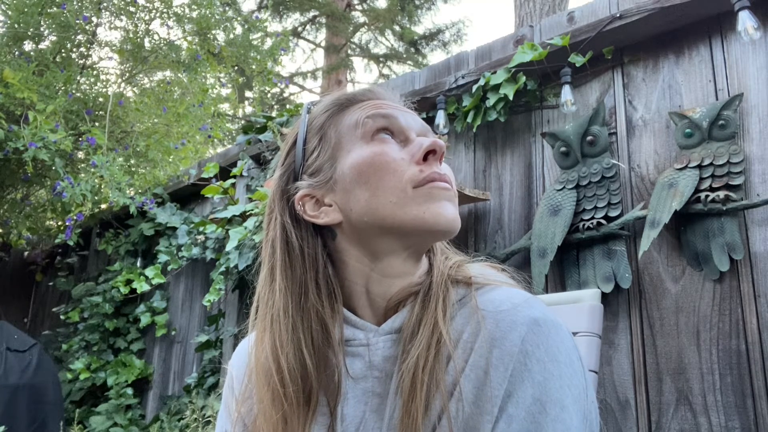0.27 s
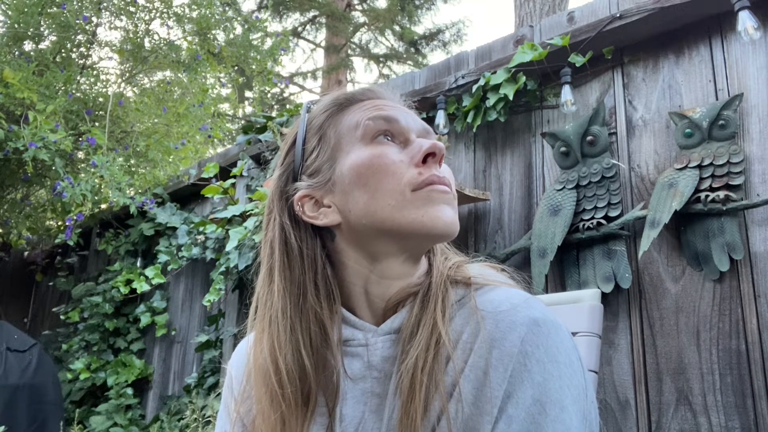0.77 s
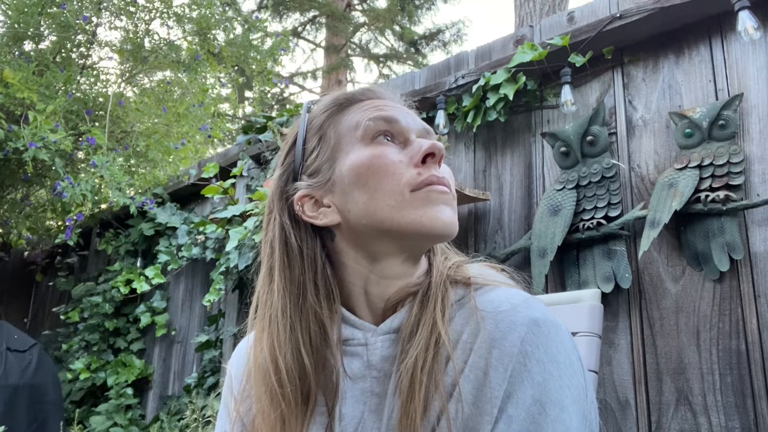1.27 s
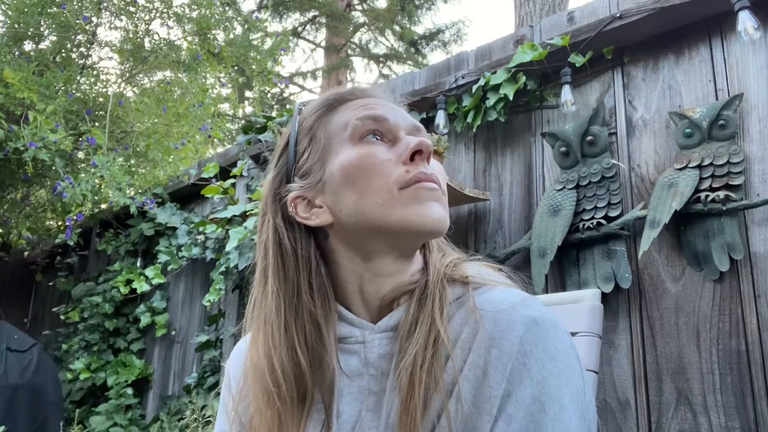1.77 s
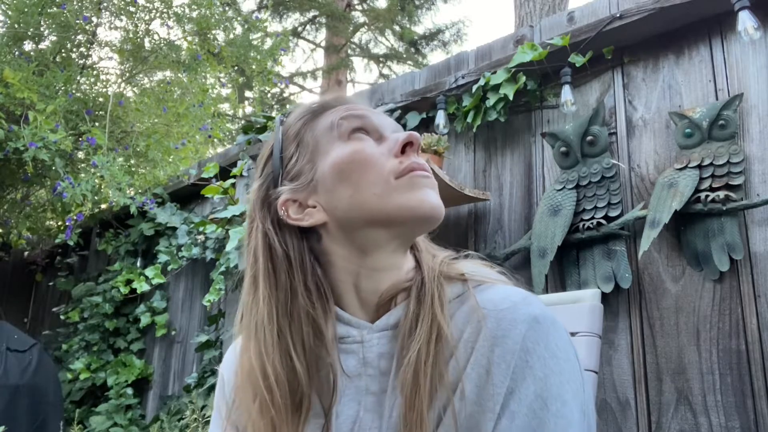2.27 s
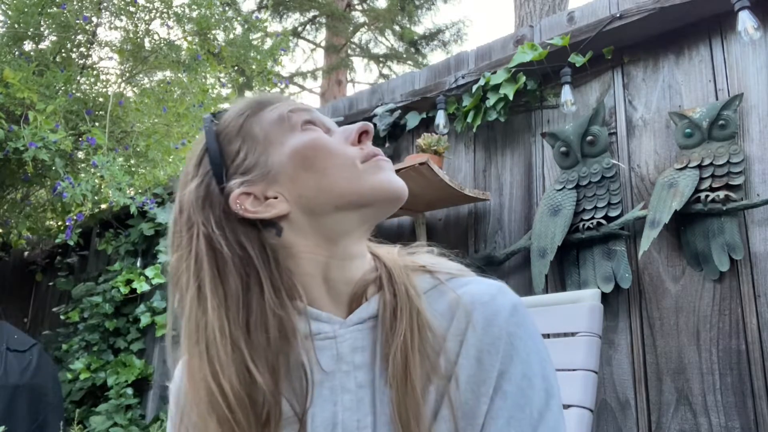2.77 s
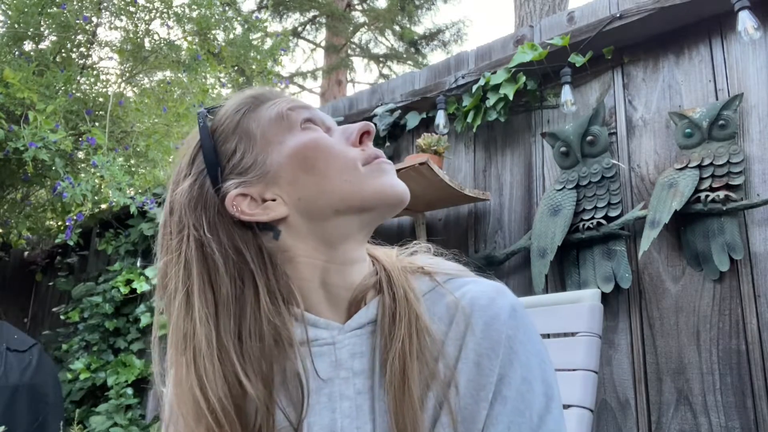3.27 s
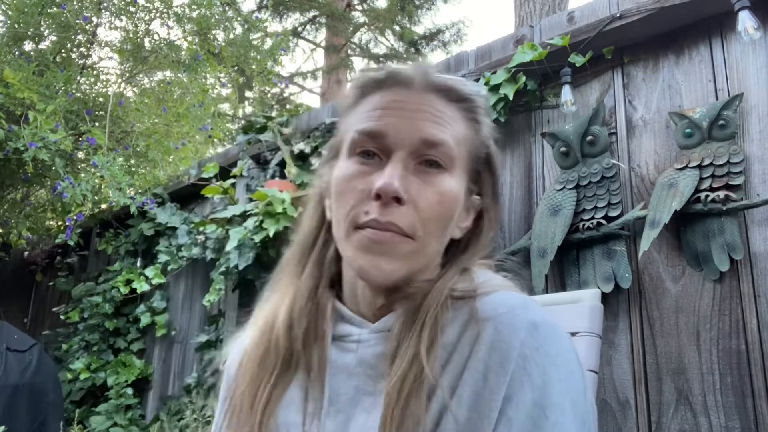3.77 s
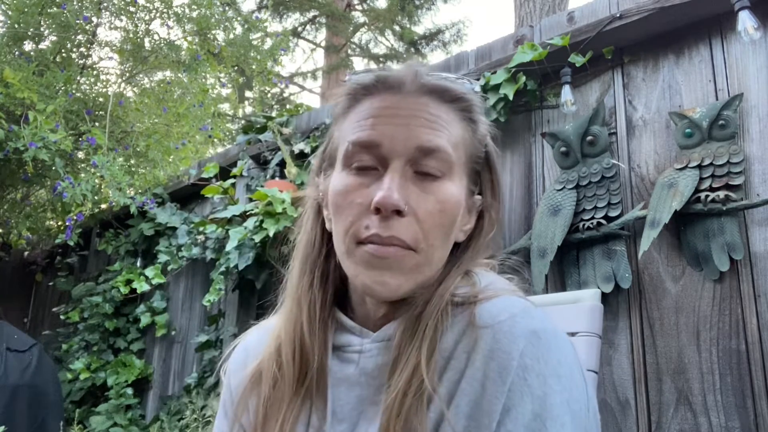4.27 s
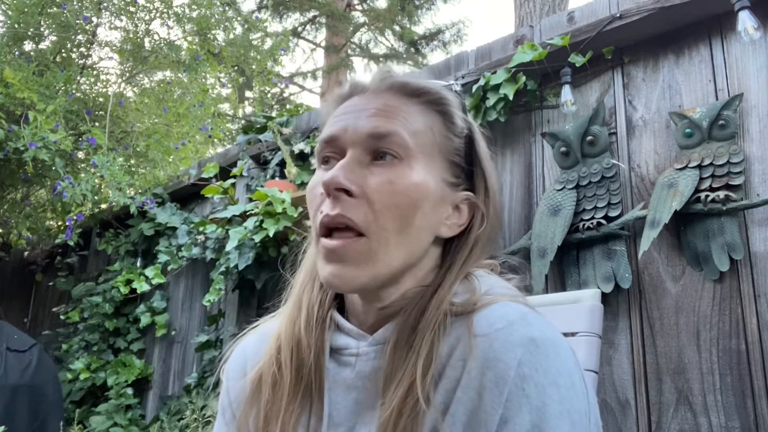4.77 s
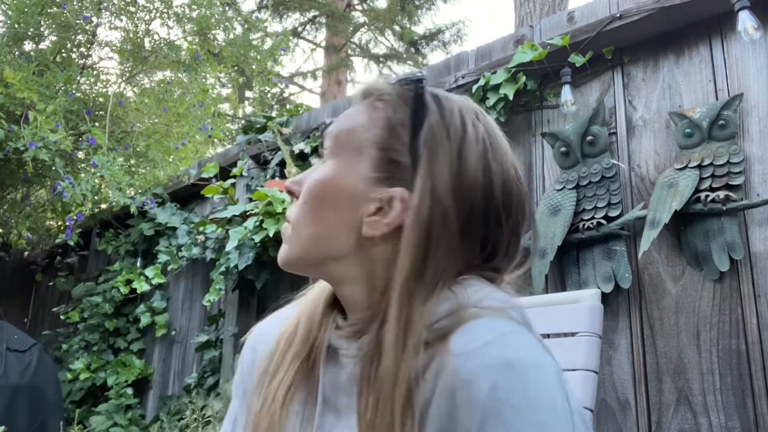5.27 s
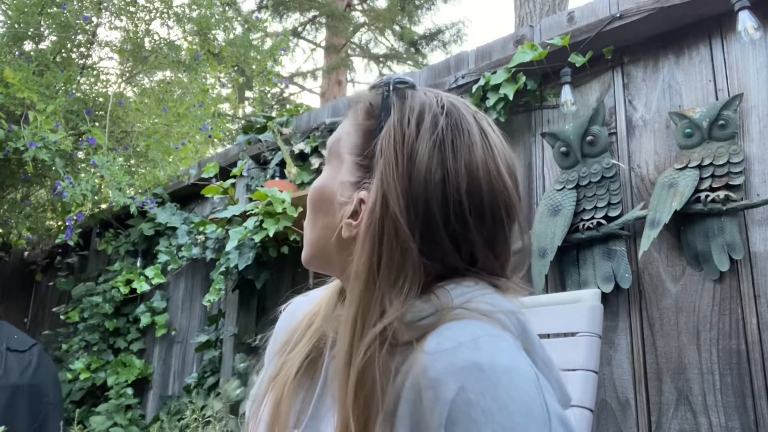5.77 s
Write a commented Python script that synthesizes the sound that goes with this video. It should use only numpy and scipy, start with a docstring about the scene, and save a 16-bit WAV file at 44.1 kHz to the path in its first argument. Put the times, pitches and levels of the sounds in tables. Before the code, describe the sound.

Two hummingbirds trade short, high chip calls outdoors, with faint distant birds, a low rumble and a few soft lip clicks nearby.

```python
"""Hummingbird chase in a backyard

A hummingbird chases a rival with sharp, falling chips, whistled by its voice organ (the syrinx).
The rival answers lower, from the left. Fence and ground throw each chip back; the trees let it ring on.
Small birds whistle far off over a low town rumble and a hiss of air. Close by, someone's lips part
with soft clicks, a garden chair knocks and a sweatshirt rubs."""
import sys
import numpy as np
from scipy import signal
from scipy.fft import rfft, irfft
from scipy.io import wavfile
from scipy.ndimage import uniform_filter1d

SR = 44100
rng = np.random.default_rng(int(sys.argv[2]) if len(sys.argv) > 2 else 0)


def dump(signal):
    """Clip the signal to [-1, 1] and save it as 16-bit WAV at the path in sys.argv[1]."""
    limited = np.clip(np.atleast_2d(signal).T, -1, 1)
    pcm = np.round(limited * 32767).astype(np.int16)
    wavfile.write(sys.argv[1], SR, pcm)


N = 265526


# How the throat shapes the tone, and the beak its octave: f/Hz, gain/dB
THROAT_GAIN = [(5000, -8), (5600, 0.5), (6400, -5.5), (7500, -3.5), (8500, -0.5), (9200, -3),
               (10000, -10.5)]
BEAK_GAIN = [(10500, -1.5), (11500, 4.5), (12200, 0.5), (13000, -4), (14300, -0.5), (15200, -6),
             (15800, -27.5), (17000, -46.5)]

def chip(length, pitches, bend, attack_s, soft_db, growth_db, plunge_s, close_s, open_s=.0012):
    """One syrinx whistle and its octave, as complex waves: the pitch plunges, then glides down."""
    onset_hz, top_hz, end_hz = pitches
    t = np.arange(round(length * SR)) / SR
    progress = t / length
    glide = end_hz + (top_hz - end_hz) * (1 - progress) ** bend
    plunge = (onset_hz - top_hz) * np.exp(-t / plunge_s)
    hz = (glide + plunge) * (1 + .008 * waver(len(t), span=60))
    phase = 2 * np.pi * np.cumsum(hz) / SR
    opening = np.clip(np.minimum(t / open_s, (length - t) / close_s), 0, 1)
    shape_db = soft_db * np.maximum(1 - t / attack_s, 0) + growth_db * (progress - .5)
    flutter_db = 2.5 * waver(len(t), span=90)
    push = np.sin(np.pi / 2 * opening) ** 2 * gain_of(shape_db + flutter_db)
    tone = push * gain_of(look_up(THROAT_GAIN, hz)) * np.exp(1j * phase)
    octave = push * gain_of(look_up(BEAK_GAIN, 2 * hz)) * np.exp(2j * phase)
    return tone, octave


def snap(length=.00092, hz=12000):
    """The tiny high tick as the syrinx opens."""
    size = round(length * SR)
    return signal.windows.hann(size) * np.sin(2 * np.pi * hz * np.arange(size) / SR)


# The chips of the bird overhead: t/s, length/s, level/dB, onset f/Hz, top of the glide f/Hz,
# end f/Hz, bend of the glide (1 = straight), echo gain/dB
CHASER_CHIPS = [(.156, 0.023, -30.5, 9500, 8680, 8366, 2.7, 6.5),
                (.688, 0.021, -35, 9870, 8930, 8550, 3.7, 9), (1.2, 0.026, -25, 9390, 8100, 7160, 2.8, 3),
                (2.153, 0.036, -25.5, 9420, 8100, 5874, 1.63, 3),
                (2.95, 0.035, -19.5, 9370, 8480, 6120, 2, -1),
                (3.75, 0.03, -24, 9110, 8500, 6250, 0.77, -1),
                (4.584, .033, -14, 9000, 8000, 5620, 2.5, -4),
                (5.447, 0.025, -24, 9100, 7700, 5856, 2.7, 4.5)]

def chaser(octave_db=-17, octave_echo_db=-19, octave_lag_rad=2.1, snap_db=-27, pan_db=-2.5):
    """Hard, bright chips that snap open; the bird moves, so each has its own echoes."""
    out = np.zeros((2, N))
    for s, length, db, *pitches, bend, echo_db in CHASER_CHIPS:
        tone, octave = chip(length, pitches, bend, attack_s=.004, soft_db=-12.5, growth_db=-5,
                            plunge_s=.0025, close_s=.0051)
        # the octave sounds out of step between left and right
        direct = tone + gain_of(octave_db) * octave * np.exp([[0], [-1j * octave_lag_rad]])
        echo = echoes((tone + gain_of(octave_echo_db) * octave).real)
        add(out, s, gain_of(db) * panned(pan_db) * direct.real)
        add(out, s, gain_of(db + snap_db) * panned(pan_db) * snap())
        add(out, s, gain_of(db + echo_db) * echo)
    return out


# The rival's answers, with the same columns as CHASER_CHIPS
RIVAL_CHIPS = [(.415, 0.019, -28.5, 9300, 6810, 5440, 1.3, 5),
               (1.809, .040, -23.5, 6680, 6710, 5458, 1.5, -1.5),
               (3.223, 0.033, -26.5, 8840, 6690, 5430, 2.93, 1),
               (4.143, 0.034, -30, 8520, 7790, 5760, 2, 0.5),
               (5.585, 0.03, -26.5, 8230, 6870, 5550, 2.84, 2)]

def rival(octave_db=-32, octave_echo_db=-27, pan_db=10, echo_pan_db=4, right_lag_s=.00041):
    """Lower, rounder chips that swell; they reach the left microphone first and louder."""
    out = np.zeros((2, N))
    for s, length, db, *pitches, bend, echo_db in RIVAL_CHIPS:
        tone, octave = chip(length, pitches, bend, attack_s=.0096, soft_db=-15.5, growth_db=-4,
                            plunge_s=.0032, close_s=.011)
        left, right = gain_of(db) * panned(pan_db) * (tone + gain_of(octave_db) * octave).real
        echo = echoes((tone + gain_of(octave_echo_db) * octave).real)
        add(out[0], s, left)
        add(out[1], s + right_lag_s, right)
        add(out, s, gain_of(db + echo_db) * panned(echo_pan_db) * echo)
    return out


# How alike the echoes are left and right: f/Hz, likeness (1 = the same)
ECHO_LIKENESS = [(5500, 0.069), (7000, 0.43), (8500, 1), (10000, 1), (11500, -0.1), (15000, 0.44)]

def echoes(x, first_s=.0035, trees_db=-12, build_s=.027):
    """What the yard throws back of x: fence and ground answer at once, the leaves linger."""
    t = np.arange(SR * 3 // 4) / SR
    near = die_away(scatter(t, per_s=1100) * (t > first_s), share=.29)
    near = np.array([normalized(side) for side in near])
    trees = die_away(rng.standard_normal((2, len(t))), share=.66) * (1 - np.exp(-t / build_s))
    yard = paired(near + gain_of(trees_db) * normalized(trees), ECHO_LIKENESS) / np.sqrt(len(t))
    return signal.fftconvolve(np.atleast_2d(x), yard, axes=1)[:, :N]


# How long the yard rings: f/Hz, time to fade by 60 dB/s
RING_TIMES = [(2000, 0.27), (5500, 0.62), (8500, 0.45), (11500, 0.45), (16000, 0.17)]

def die_away(x, share):
    """Fades each frequency of x in a share of the yard's ringing time."""
    hz, t, spectrum = signal.stft(x, SR, nperseg=256)
    fade = gain_of(-60 * t / (share * look_up(RING_TIMES, hz)[:, None]))
    return signal.istft(spectrum * fade, SR, nperseg=256)[1][:, :x.shape[1]]


# Lips parting: t/s, level/dB, decay/s, mouth resonance f/Hz, treble/dB
LIP_CLICKS = [(4.416, -66.5, 0.0084, 1870, 7.5), (4.521, -57, 0.016, 2210, -8),
              (4.543, -55.5, 0.04, 1930, 5.5), (4.606, -47, 0.044, 1970, 9.5),
              (4.699, -37.5, 0.0069, 1730, 19), (4.714, -38.5, 0.014, 1600, 37),
              (4.73, -49, 0.039, 1660, 7), (4.808, -42.5, 0.0073, 1540, -13)]
# Small knocks of a garden chair: t/s, level/dB
CHAIR_KNOCKS = [(2.857, -55.5), (4.199, -57.5), (5.238, -56)]
# The crisp edge of both: f/Hz, level/dB
CLICK_TREBLE = [(500, -2), (1500, -9.5), (2700, 4), (4200, -8), (6000, 3), (9300, 9.5), (12500, 0.5),
                (13600, -17.5), (16000, -31.5)]

def lips_and_chair(knock_decay_s=.005, knock_hz=870, knock_treble_db=-26, damping=.38, echo_db=-11):
    """Each click or knock is a firm snap and a dying clump of tiny ones, ringing one hollow note."""
    out = np.zeros((2, N))
    t = np.arange(SR // 8) / SR
    knocks = [(s, db, knock_decay_s, knock_hz, knock_treble_db) for s, db in CHAIR_KNOCKS]
    for s, db, decay, hz, treble_db in LIP_CLICKS + knocks:
        snaps = scatter(t, per_s=2500)
        snaps[:, 0] = 1.3  # the firm first snap
        snaps = snaps + .5 * snaps[::-1]  # each side also hears the other
        ring = np.exp(-np.pi * damping * hz * t) * np.sin(2 * np.pi * hz * t)
        hollow = normalized(signal.fftconvolve(snaps, ring[None], axes=1)[:, :len(t)])
        crisp = gain_of(treble_db) * coloured(snaps, CLICK_TREBLE)
        add(out, s, gain_of(db) * np.exp(-t / decay) * normalized(hollow + crisp))
    return out + gain_of(echo_db) * echoes(out)


# Small birds far off: t/s, length/s, level/dB, start f/Hz, end f/Hz, hoarseness as a width/Hz
FAR_WHISTLES = [(-.01, 0.085, -66, 6430, 6230, 360), (0.222, 0.11, -59, 8250, 6550, 800),
                (0.956, 0.066, -72.5, 6720, 6620, 353), (1.072, 0.24, -62.5, 6290, 6210, 251),
                (1.288, 0.12, -72, 5960, 5610, 200), (2.434, .18, -72, 7480, 7570, 2430),
                (2.649, 0.14, -76.5, 6030, 5870, 615), (2.877, 0.05, -74, 5240, 5340, 2480)]

def far_birds(echo_db=-2):
    """Thin, hoarse whistles: narrow bands of sliding noise, half lost in their echo."""
    out = np.zeros(N)
    for s, length, db, start_hz, end_hz, width_hz in FAR_WHISTLES:
        size = round(length * SR)
        phase = 2 * np.pi * np.cumsum(np.linspace(start_hz, end_hz, size)) / SR
        smooth = signal.butter(2, width_hz / 2, fs=SR)
        rasp = signal.lfilter(*smooth, rng.standard_normal((2, size)))
        whistle = normalized(rasp[0] * np.sin(phase) + rasp[1] * np.cos(phase)) / np.sqrt(2)
        add(out, s, gain_of(db) * signal.windows.tukey(size, .7) * whistle)
    return out + gain_of(echo_db) * echoes(out)


# The rubbing as a shoulder turns: t/s, level/dB
SHOULDER_TURN = [(5.84, -78), (5.885, -62), (5.92, -63), (5.959, -57.5), (6.02, -59)]
# The tone colour of the cloth: f/Hz, level/dB
CLOTH_COLOUR = [(100, -15), (300, -9), (700, -5), (1050, 9.5), (1500, -4), (2200, -7), (4000, -17.5),
                (8000, -22), (12000, -29), (16000, -42.5)]

def sweatshirt(grain_db=3):
    """A sweatshirt rubs in small catches as its wearer turns."""
    s, db = np.transpose(SHOULDER_TURN)
    rub_db = np.interp(np.arange(N) / SR, s, db, left=-np.inf)
    return gain_of(rub_db + grain_db * waver(N, span=250)) * stereo_noise(CLOTH_COLOUR)


# The tone colour of the town: f/Hz, level/dB
TOWN_COLOUR = [(22, -33.5), (35, -17), (48, -9), (60, 2), (85, -8), (113, -4.5), (182, -12.5), (249, -15.5),
               (300, -19), (448, -21), (1000, -34.5), (1500, -57), (2500, -88.5)]
# How it rises and falls: t/s, bass level/dB (before bass_trim_db), low middle level/dB
TOWN_SWELL = [(0.05, -52, -56.5), (0.71, -51, -57.5), (0.82, -49.5, -57), (2.07, -49, -55),
              (3.04, -48.5, -57), (3.38, -49.5, -57), (4.95, -50, -53), (5.0, -41.5, -55),
              (5.34, -50.5, -52.5), (5.95, -46.5, -54)]

def town(pan_db=2, split_hz=150, bass_trim_db=-1, hum_hz=58, hum_db=-58, hum_drift=.097):
    """Distant rumble that swells and ebbs, with a wavering low hum in it."""
    t = np.arange(N) / SR
    s, bass_db, middle_db = np.transpose(TOWN_SWELL)
    noise = stereo_noise(TOWN_COLOUR)
    bass = signal.sosfiltfilt(signal.butter(4, split_hz, fs=SR, output="sos"), noise, padtype="even")
    rumble = gain_of(np.interp(t, s, bass_db) + bass_trim_db) * normalized(bass)
    roar = gain_of(np.interp(t, s, middle_db)) * normalized(noise - bass)
    hz = hum_hz * (1 + hum_drift * waver(N, span=3000))
    hum = gain_of(hum_db) * normalized(np.sin(2 * np.pi * np.cumsum(hz) / SR))
    return panned(pan_db) * (rumble + roar + hum)


# The tone colour of the air: f/Hz, level/dB
AIR_COLOUR = [(300, -10), (900, 2.5), (1500, 0.5), (2500, -5), (4000, -13), (6500, -11), (9000, -13.5),
              (12000, -17.5), (16000, -35.5)]

def air(level_db=-77):
    """The faint steady hiss of the open air."""
    return gain_of(level_db) * stereo_noise(AIR_COLOUR)


# How alike cloth, town and air are left and right: f/Hz, likeness (1 = the same, -1 = opposite)
NOISE_LIKENESS = [(30, 0.61), (120, 0.93), (250, 0.78), (500, -.1), (1000, -0.46), (4000, 0.3),
                  (8000, 0.68), (12000, 0.035)]

def stereo_noise(colour):
    """Steady noise of a given tone colour, partly shared by left and right."""
    return coloured(paired(rng.standard_normal((2, N)), NOISE_LIKENESS), colour)


def gain_of(db):
    """Decibels to amplitude."""
    return 10 ** (np.asarray(db) / 20)


def normalized(x):
    """Scales x to an average strength (rms) of 1."""
    return x / np.sqrt(np.mean(x ** 2) + 1e-20)


def look_up(table, hz):
    """Reads between a table's rows on a log-frequency axis."""
    f, value = np.transpose(table)
    return np.interp(np.log(hz + 1), np.log(f + 1), value)


def add(mix, s, sound):
    """Mixes a sound in at s seconds."""
    start = round(s * SR)
    sound = sound[..., max(-start, 0):]
    part = mix[..., max(start, 0):][..., :sound.shape[-1]]
    part += sound[..., :part.shape[-1]]


def coloured(x, colour):
    """Gives x a tone colour, at strength 1."""
    size = x.shape[-1]
    gain = gain_of(look_up(colour, np.fft.rfftfreq(size, 1 / SR)))
    return normalized(irfft(rfft(x) * gain, size))


def paired(x, likeness):
    """Makes two unrelated channels alike, frequency by frequency."""
    size = x.shape[-1]
    left, right = rfft(x)
    same = np.clip(look_up(likeness, np.fft.rfftfreq(size, 1 / SR)), -1, 1)
    return irfft(np.array([left, same * left + np.sqrt(1 - same ** 2) * right]), size)


def panned(db):
    """Two gains that put the left side db above the right."""
    return gain_of([[db / 2], [-db / 2]])


def scatter(t, per_s):
    """Scattered ticks of random strength, left and right."""
    return rng.standard_normal((2, len(t))) * (rng.random((2, len(t))) < per_s / SR)


def waver(size, span):
    """A random wobble of strength 1, smoothed over span samples."""
    return normalized(uniform_filter1d(uniform_filter1d(rng.standard_normal(size), span), span))


def scene():
    """Everything at the two microphones."""
    return chaser() + rival() + far_birds() + lips_and_chair() + sweatshirt() + town() + air()


def record(dry):
    """Cuts away the highest treble, above 15900 Hz."""
    lowpass = signal.firwin(511, 15900, window=("kaiser", 9), fs=SR)
    return signal.oaconvolve(dry, lowpass[None], "same")


dry = scene()
out = record(dry)
dump(out)
```